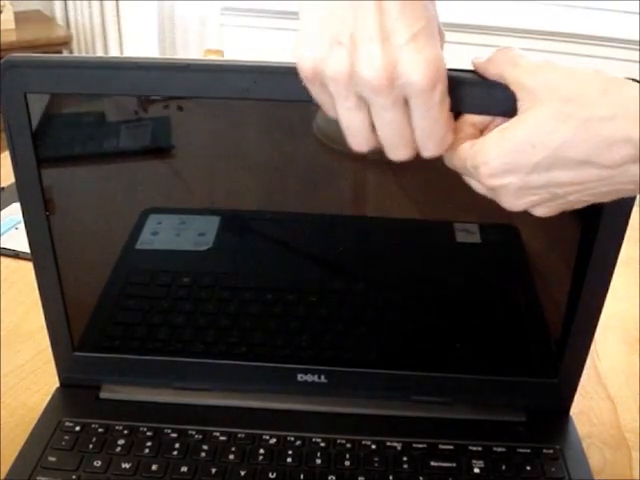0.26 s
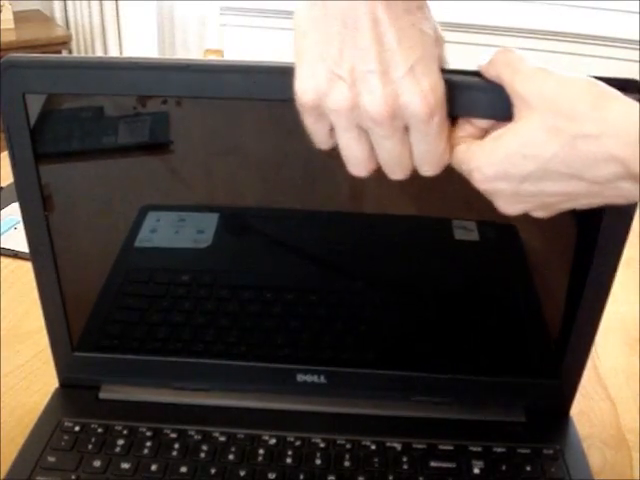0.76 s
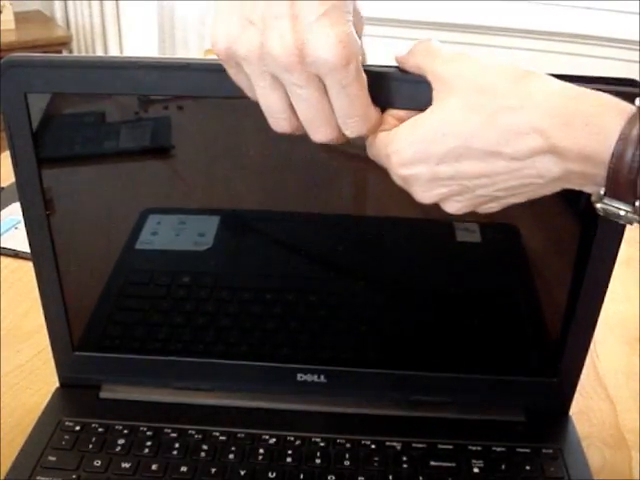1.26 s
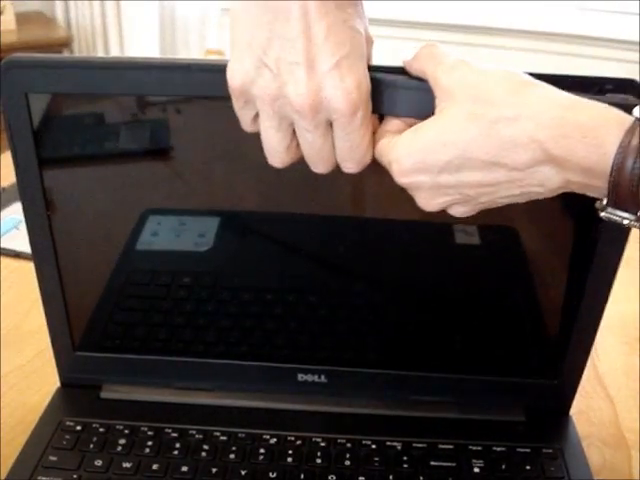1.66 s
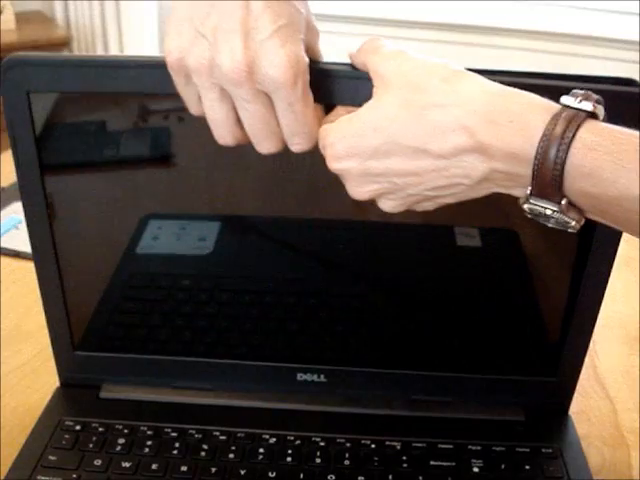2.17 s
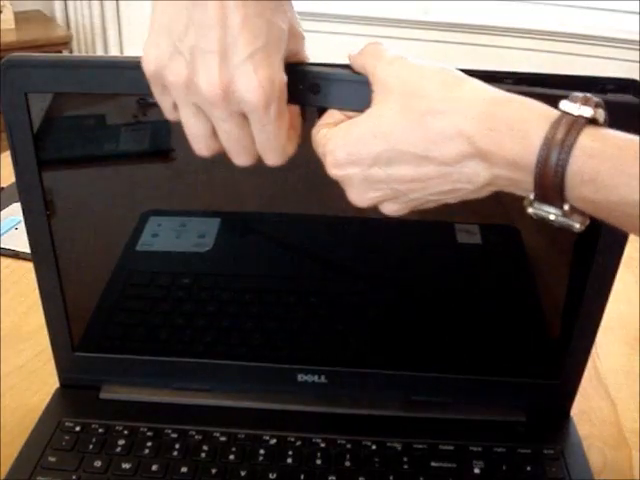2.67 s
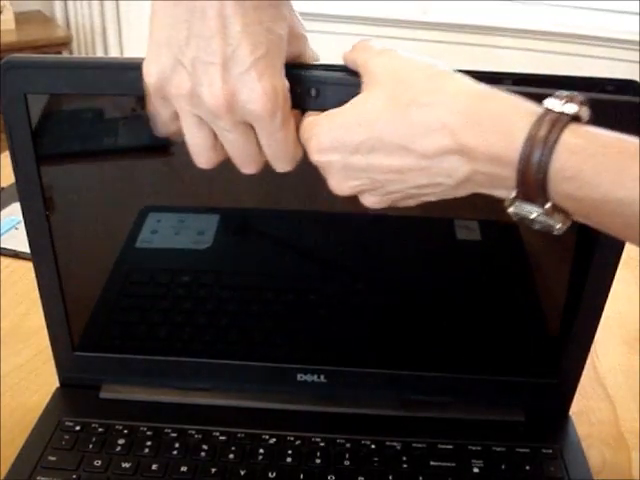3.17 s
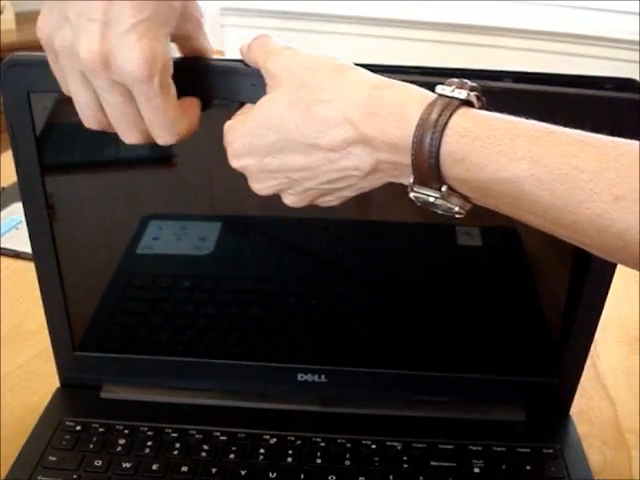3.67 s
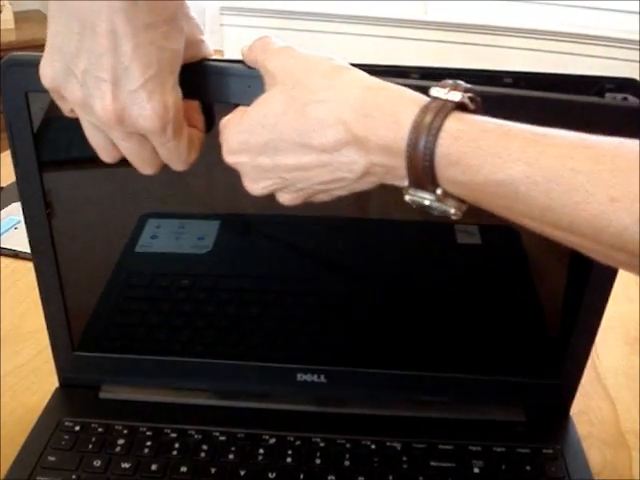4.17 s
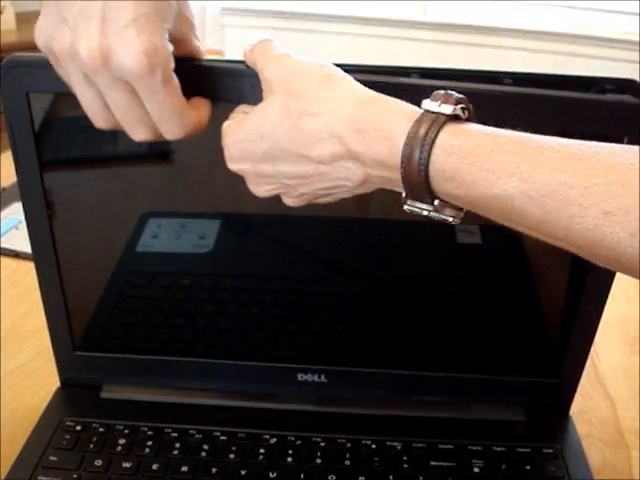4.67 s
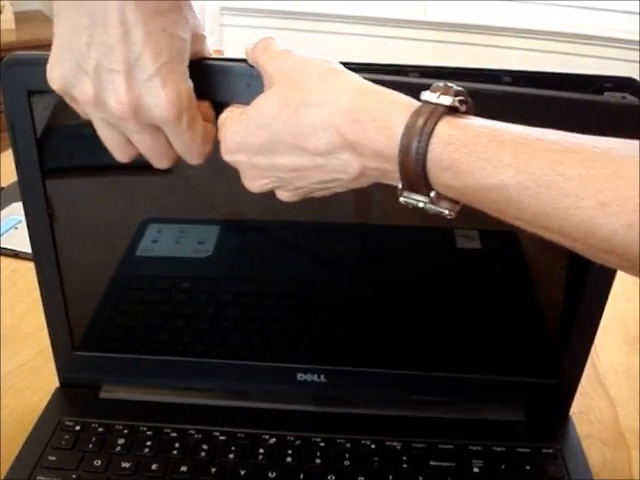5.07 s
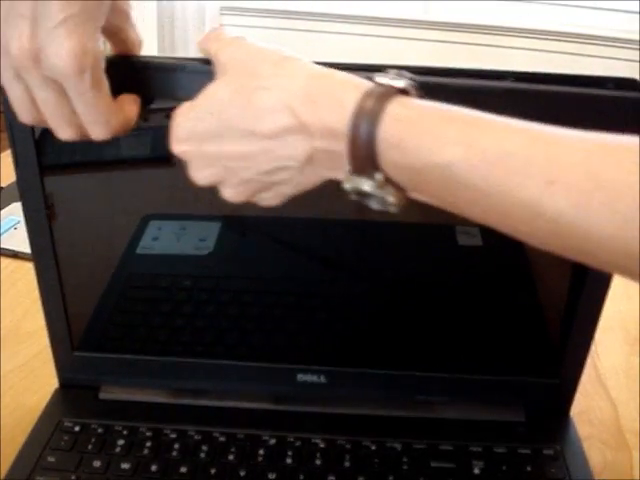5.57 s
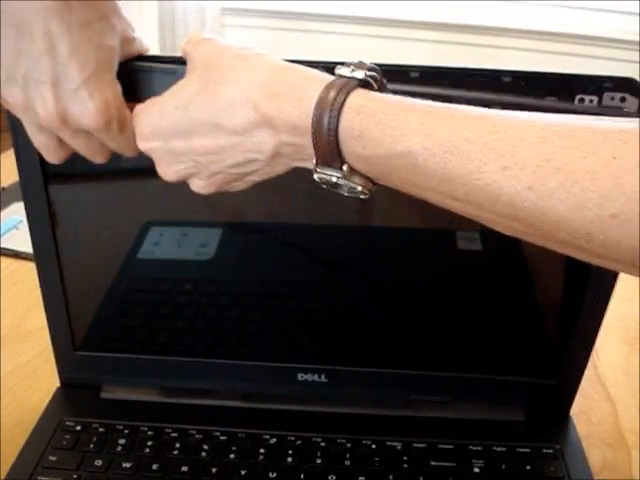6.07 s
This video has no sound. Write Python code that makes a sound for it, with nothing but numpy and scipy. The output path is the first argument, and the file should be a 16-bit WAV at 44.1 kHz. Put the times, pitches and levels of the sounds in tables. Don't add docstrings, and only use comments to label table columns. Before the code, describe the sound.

Five sharp plastic clips pop loose around a laptop screen frame, with small creaky ticks and soft panel thumps between them in a small bright room.

```python
import sys
import numpy as np
from scipy import signal
from scipy.fft import rfft, irfft, next_fast_len
from scipy.io import wavfile
from scipy.ndimage import uniform_filter1d

SR = 44100
rng = np.random.default_rng(int(sys.argv[2]) if len(sys.argv) > 2 else 0)


def put_to_file(sound):
    columns = np.atleast_2d(sound).T
    safe = np.clip(columns, -1, 1)
    whole_steps = np.round(safe * 32767)
    wavfile.write(sys.argv[1], SR, whole_steps.astype(np.int16))


def elevation(decibels):
    levels = np.asarray(decibels, float)
    return 10 ** (levels / 20)


N = 279153

# t/s, peak level/dB
CLIP_RELEASES = [
    (.5801, -9),
    (1.6284, -6.5),
    (2.987, -12),
    (5.1015, -12),
    (6.066, -11.5),
]
# f/Hz, level/dB, t60/s
FRAME_MODES = [(2247, -8, 0.028), (2776, -4, 0.021), (3114, -10, 0.036), (3463, -2, 0.018),
               (3750, 0.5, 0.016), (4110, -3.5, 0.017), (4680, -6, 0.012), (7010, 0.5, 0.0073)]


def unit(x):
    return x / np.sqrt(np.mean(x ** 2) + 1e-20)


def along(points, hz):
    f, v = np.transpose(points)
    return np.interp(np.log(hz + 1), np.log(f + 1), v)


def filtered(x, response):
    m = next_fast_len(len(x) + 8192)
    return irfft(rfft(x, m) * response(np.fft.rfftfreq(m, 1 / SR)), m)[:len(x)]


def add(track, s, sound):
    part = track[round(s * SR):][:len(sound)]
    part += sound[:len(part)]


def patches(shape, bins, frames):
    field = uniform_filter1d(rng.standard_normal(shape), size=bins, axis=0)
    return unit(uniform_filter1d(field, size=frames, axis=1))


def ring(modes, t, scatter_db):
    out = np.zeros(len(t))
    for hz, db, t60 in modes:
        strength, detune = rng.standard_normal(2)
        decay = elevation(db + scatter_db * strength - 60 * t / t60)
        out += decay * np.sin(2 * np.pi * hz * (1 + .015 * detune) * t)
    return out


def room_answer(colour, t, stretch, hold):
    # f/Hz, t60/s
    room_t60 = [(100, 0.093), (500, 0.3), (1200, .25), (3000, 0.25), (6000, .23), (10000, 0.18)]
    hz, frames, z = signal.stft(unit(filtered(rng.standard_normal(len(t)), colour)), SR, nperseg=256)
    clusters = elevation(1.3 * patches(z.shape, 7, 3))
    fall_db = -60 * np.maximum(frames - hold, 0) / (stretch * along(room_t60, hz)[:, None])
    decay = np.hypot(elevation(fall_db), elevation(-10.0 + fall_db / 1.815))
    return signal.istft(z * clusters * decay, SR, nperseg=256)[1][:len(t)]


def pops():
    # frame rattle level/dB, room answer level/dB, gain hold/s, decay stretch
    aftermaths = [
        (-22, -24, 0.029, 1.0),
        (-43, -23.5, 0.019, 1.035),
        (-26, -21.5, 0.022, 1.06),
        (-16.5, -21, 0.025, 1.08),
        (-20, -21.5, 0.022, 0.98),
    ]
    # bass/dB, bending hump/dB, mid hump/dB, treble/dB
    places = [(1, -7.5, -3.5, -1.5), (5, -2.5, 0.5, 2.5), (-4.5, 1, -0.5, 0), (1.5, 1, 1, 2),
              (-5, 2, 1, -2.5)]
    # f/Hz, width/Hz, level/dB
    spans = [(3080, 400, 2), (4000, 250, 4.5), (3400, 300, 1.5), (4000, 120, 3.5), (1520, 100, -9)]
    # f/Hz, level/dB per Hz
    snap_colour = [(50, -38), (200, -15.5), (480, -8.5), (800, -9), (1100, 1), (3500, -3), (5000, -9.5),
                   (9600, -15.5)]
    # delay/s, level/dB
    bounces = [(.0011, -8), (.002, -7), (.0035, -8), (.0047, -10), (.0062, -10)]

    out, t = np.zeros(N), np.arange(SR * 6 // 10) / SR
    suction = -1.15 * np.exp(-((t - .0002) / .000075) ** 2)
    rebound = .4 * np.exp(-((t - .00034) / .00013) ** 2)
    spike = rebound + suction
    push = -.085 * np.exp(-t / .002) * (t > .0002)

    for release, aftermath, place_db, span in zip(CLIP_RELEASES, aftermaths, places, spans):
        s, spike_db = release
        rattle_db, room_db, hold, stretch = aftermath
        span_hz, span_width, span_db = span
        place = list(zip([500, 1200, 2100, 3000, 7000], np.insert(place_db, 3, 0)))

        def colour(hz):
            span_hump = span_db / (1 + ((hz - span_hz) / span_width) ** 2)
            turned_db = 1.5 * (s - 2) * np.clip((hz - 7000) / 2600, 0, 1)
            return elevation(along(snap_colour, hz) + along(place, hz) + span_hump - turned_db)

        rattle = elevation(rattle_db) * ring(FRAME_MODES[:-1], t, scatter_db=3) * (1 - np.exp(-t / .0003))
        tail = room_answer(colour, t, stretch, hold) * (1 - np.exp(-t / 0.00014))
        body = rattle + elevation(room_db) * tail
        rounded = body / (1 + (body / .3) ** 4) ** .25
        add(out, s - .0002, elevation(spike_db) * (spike + push) + rounded)
        for delay, db in bounces:
            add(out, s + delay * rng.uniform(.9, 1.1), elevation(spike_db + db) * np.diff(spike[:64]) * 2)
        creak = filtered(rng.standard_normal(256), lambda hz: colour(hz) * np.clip(hz / 3000, 0, 1))
        add(out, s - 264 / SR, elevation(room_db - 10) * unit(creak) * elevation(np.linspace(-32, 0, num=256)))
    return out


def panel_thumps():
    # f/Hz, free t60/s
    panel_modes = [(273.7, 0.31), (143.8, 0.42)]
    # t/s, upper mode level/dB, lower mode level/dB, share of the free ring left
    jolts = [
        (.579, -36, -48, 0.79),
        (1.631, -40, -54, 1.03),
        (2.201, -29.5, -62, 0.1),
        (2.21, -59, -54, 0.82),
        (2.236, -49, -63, .35),
        (2.987, -45.5, -47.5, 1.12),
        (5.103, -49, -66, 2),
        (5.399, -50, -49, 0.23),
        (5.435, -48, -61, 0.33),
        (6.066, -68, -47.5, 1.1),
    ]
    out, t = np.zeros(N), np.arange(SR // 2) / SR
    for s, *levels_db, share in jolts:
        for (hz, t60), db in zip(panel_modes, levels_db):
            envelope = elevation(db - 60 * t / (t60 * share)) * (1 - np.exp(-t / 0.0059))
            add(out, s, envelope * np.sin(2 * np.pi * hz * t))
    return out


def plastic_ticks():
    # t/s, peak level/dB, lowest mode f/Hz, lowest mode level/dB, top modes level/dB
    slips = [(0.156, -44, 1350, -5, -1), (1.057, -45, 1250, -9, 2), (1.9933, -42.5, 1140, 6.5, -29),
             (2.09, -28.5, 1356, -9, 0), (2.203, -26.5, 1180, -1.5, -9), (2.2237, -29.5, 1340, -3, -16),
             (2.2916, -38.5, 1230, 4, -14), (2.833, -29.5, 1514, -3, 1.5), (3.212, -30.5, 1040, -3.5, 2),
             (3.2307, -46, 1320, 6, 1), (3.3352, -47.5, 1180, 10.5, 4), (3.4745, -38.5, 1120, 1.5, -2),
             (4.082, -41.5, 1280, 6, 8), (4.087, -27, 1406, -7.5, -0.5), (4.6866, -27.5, 1366, 0.5, -4.5),
             (4.8282, -42, 1060, -3, -1), (4.9243, -25.5, 1294, -5, 4), (5.3305, -34.5, 1390, -4, 2.5),
             (5.5905, -29.5, 1360, -6.5, -1), (5.9288, -36.5, 1290, 1.5, -7), (6.3178, -36, 1490, -5, -1),
             (5.289, -32, 1360, -3, -6)]
    # f/Hz, level/dB per Hz
    scratch_colour = [(300, 0), (900, 1.5), (1300, -1), (2300, 0.5), (4300, -4.5), (5500, -4.5),
                      (7500, -11.5), (10000, -8.5)]
    out, t = np.zeros(N), np.arange(SR // 4) / SR
    rise = 1 - np.exp(-t / .0006)
    for s, db, low_hz, low_db, high_db in slips:
        room_db = -49.5 - 1.4 * s + 0.13 * (db + 31.5) - db
        tilt = [(1500, low_db), (2100, 0), (3300, 0), (4300, high_db), (5500, high_db), (7200, high_db - 3)]

        def colour(hz):
            return elevation(along(scratch_colour, hz) + along(tilt, hz))

        scratch = .3 * unit(filtered(rng.standard_normal(len(t)), colour)) * elevation(-60 * t / .03)
        modes = [(low_hz, -2, .035)] + FRAME_MODES
        tilted = [(hz, level + along(tilt, hz), t60) for hz, level, t60 in modes]
        ringing = .5 * ring(tilted, t, scatter_db=2.5)
        room = elevation(room_db) * room_answer(colour, t, 1.0, 0)
        add(out, s, elevation(db - 4.5) * rise * (scratch + ringing + room))
    return out


def room_hush():
    # t/s, level/dB
    outside = [(0, -60), (.5, -60.5), (1.4, -60.5), (2.6, -61), (3.8, -61), (4.6, -60.5), (5.2, -57),
               (5.7, -60.5), (6.33, -62.5)]
    # f/Hz, level/dB per Hz
    rumble_colour = [(15, -66), (25, 12.5), (74, -0.5), (188, 1), (261, -1.5), (381, -0.5), (946, -8),
                     (1820, -14)]
    # f/Hz, level/dB per Hz
    hiss_colour = [(381, 7), (946, -7), (1820, -12.5), (3700, -16), (6440, -20), (7680, -23), (9640, -24),
                   (10400, -24.5)]
    # f/Hz, width/Hz, level/dB
    whine = [(1826, 14.4, 9), (3930, 110, 4.5), (7700, 94, 7.5)]

    time = np.arange(N) / SR
    since = np.maximum(time - np.array(CLIP_RELEASES)[:, :1], 0) / 0.22
    duck_db = 3.5 * (since * np.exp(1 - since)).sum(axis=0)
    outside_db = np.interp(time, *np.transpose(outside))
    hiss_db = -60.5 + .15 * (outside_db - outside_db.mean()) - 0.18 * duck_db

    z = signal.stft(rng.standard_normal(N), nperseg=512)[2]
    noise = signal.istft(z * elevation(1.25 * patches(z.shape, 8, 10)), nperseg=512)[1][:N]

    def low(hz):
        return 1 / (1 + (hz / 950) ** 6)

    def rumble_response(hz):
        return elevation(along(rumble_colour, hz)) * low(hz) / (1 + (110 / (hz + 1)) ** 2)

    def hiss_response(hz):
        humps_db = sum(db / (1 + ((hz - centre) / width) ** 2) for centre, width, db in whine)
        return elevation(along(hiss_colour, hz) + humps_db) * (1 - low(hz)) * (hz < 10800)

    rumble = unit(filtered(noise, rumble_response))
    hiss = unit(filtered(noise, hiss_response))
    wander = 0.022 * np.cumsum(rng.standard_normal(N))
    whistle_level = elevation(-72.5 + 1.5 * np.sin(2 * np.pi * .48 * time + 0.33))
    whistle = whistle_level * np.sin(2 * np.pi * 7580 * time + wander)
    return elevation(outside_db - duck_db) * rumble + elevation(hiss_db) * hiss + whistle


def far_chirps():
    # centre t/s, f/Hz, level/dB, length/s
    calls = [(.13, 1934, -57.5, 0.024), (.465, 3450, -63, 0.033), (1.48, 4330, -64, .05),
             (2.07, 4000, -69, .05), (2.4, 3830, -65, 0.046), (2.53, 3850, -63, .04),
             (3.38, 3870, -67, 0.0306), (3.57, 3840, -63, .04), (4.3, 3900, -62.5, .04),
             (4.577, 3900, -61, 0.0294), (5.83, 3850, -59, .04)]
    out = np.zeros(N)
    for s, hz, db, length in calls:
        t = np.arange(round(length * SR)) / SR
        add(out, s - length / 2, elevation(db) * np.hanning(len(t)) ** .5 * np.sin(2 * np.pi * hz * t))
    return out


def scene():
    return (pops() + panel_thumps() + plastic_ticks() + far_chirps() + room_hush())[None]


def roll_off(x):
    return signal.sosfilt(signal.butter(12, 11130, fs=SR, output="sos"), x)


def record(dry):
    # from t/s, to t/s, above f/Hz, share of bands spared
    starved = [(2.098, 2.122, 3200, .3), (2.82, 2.831, 4000, .3), (2.954, 2.981, 1700, 0),
               (4.069, 4.081, 3000, .15), (4.097, 4.104, 2500, .2), (4.897, 4.921, 3200, 0),
               (5.077, 5.096, 800, 0), (5.35, 5.362, 4700, .15), (5.579, 5.586, 3800, .3),
               (5.603, 5.613, 4300, .6), (2.216, 2.23, 5600, .45), (6.049, 6.061, 900, 0)]
    limited = filtered(dry[0], lambda hz: 1 / (1 + (hz / 10030) ** 220))
    hz, t, z = signal.stft(limited, SR, nperseg=256, noverlap=192)
    rows, columns = z.shape
    luck = rng.random((rows // 3 + 1, columns // 6 + 1))
    luck = luck.repeat(3, axis=0).repeat(6, axis=1)[:rows, :columns]
    dropped = luck < np.clip((hz[:, None] - 3500) / 6500, 0, 1) * .17
    for start, end, above_hz, spared in starved:
        dropped |= (hz[:, None] > above_hz) & (t > start) & (t < end) & (luck < 1 - spared)
    thinned = z * np.where(dropped, elevation(-26), 1)
    mix = signal.istft(thinned, SR, nperseg=256, noverlap=192)[1][None, :N]
    return roll_off(mix)


dry = scene()
out = record(dry)
put_to_file(out)
```